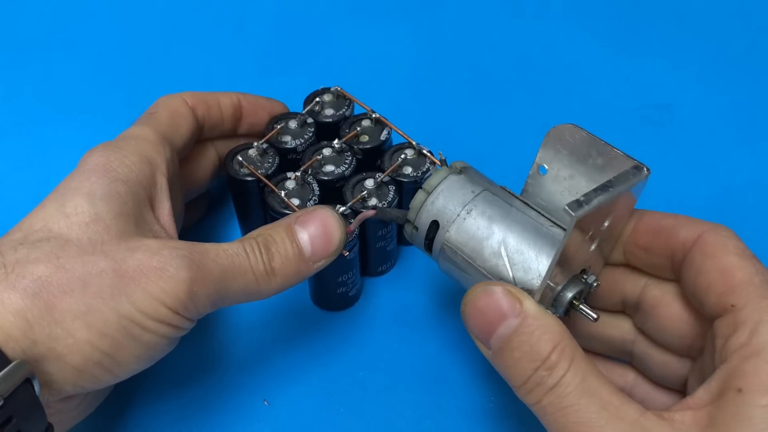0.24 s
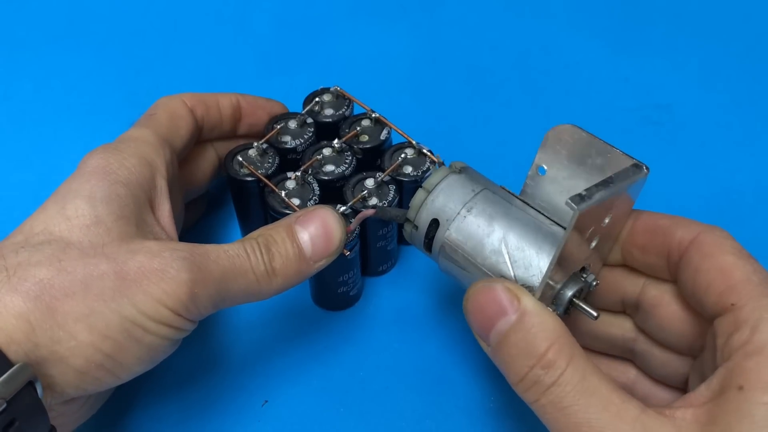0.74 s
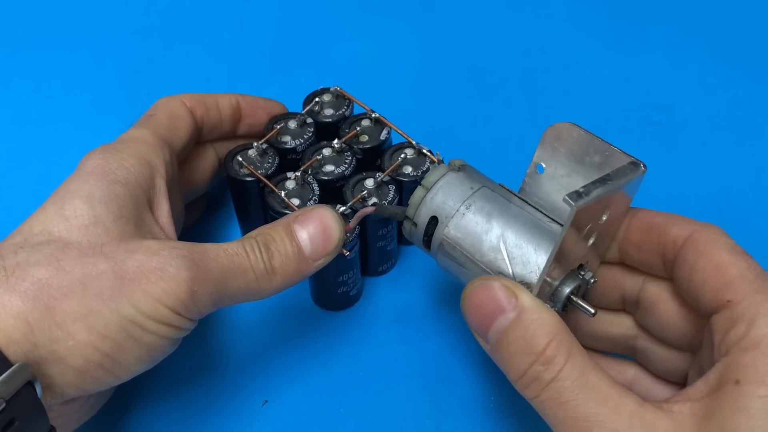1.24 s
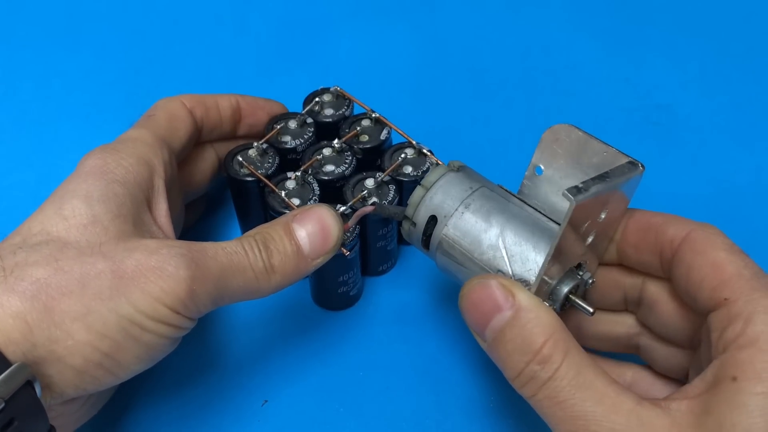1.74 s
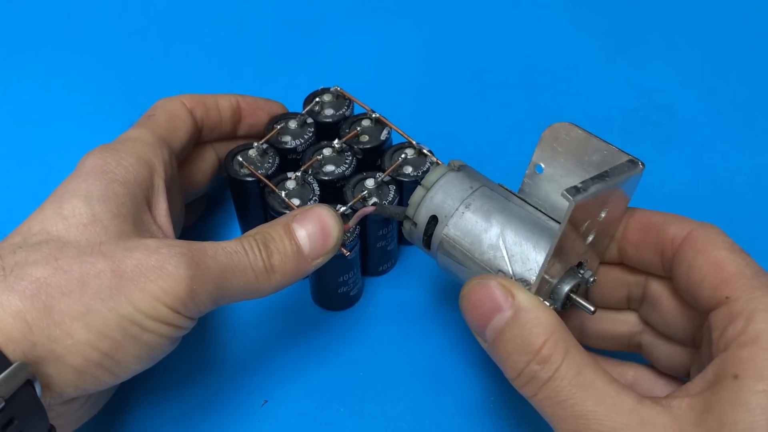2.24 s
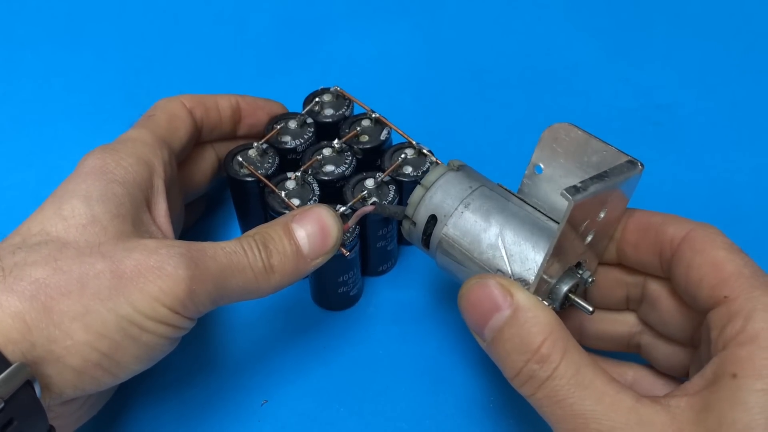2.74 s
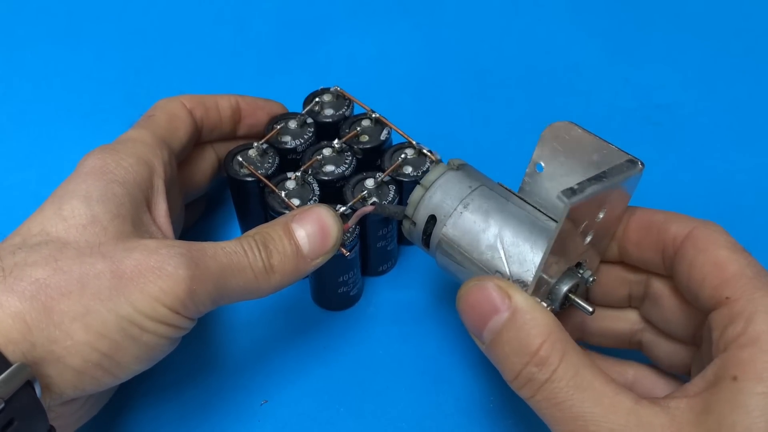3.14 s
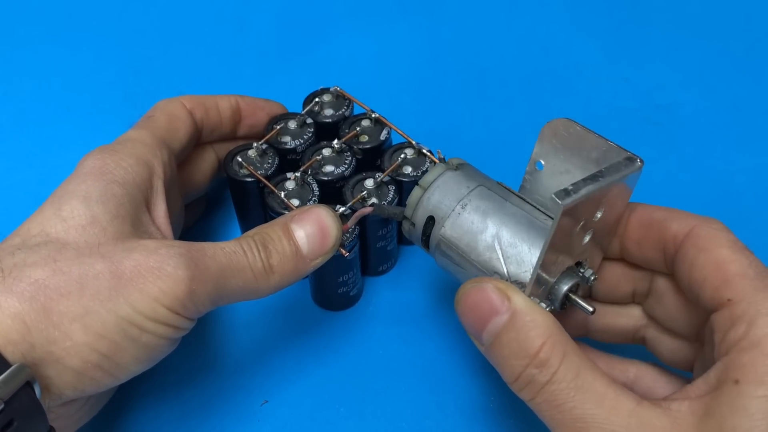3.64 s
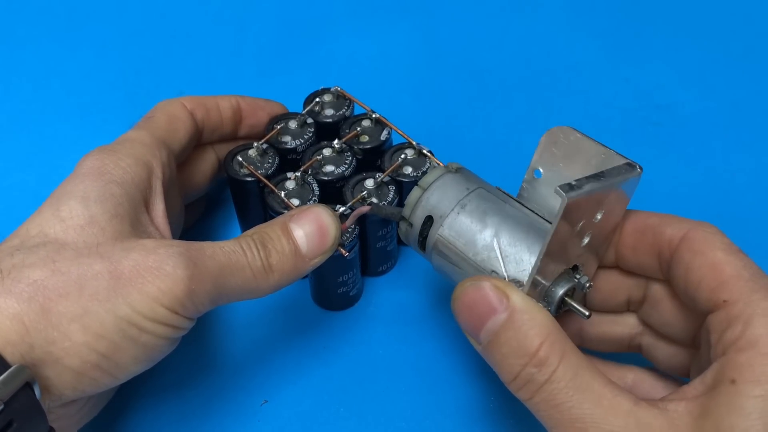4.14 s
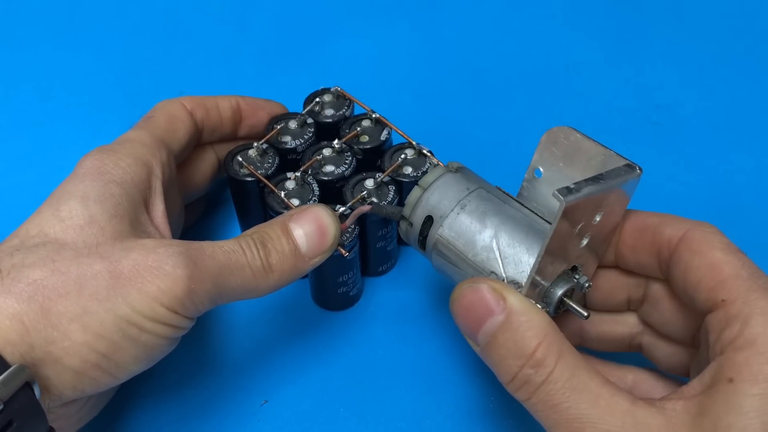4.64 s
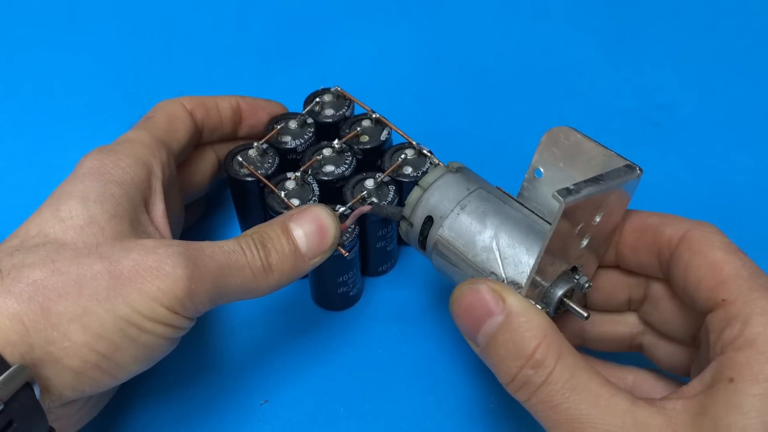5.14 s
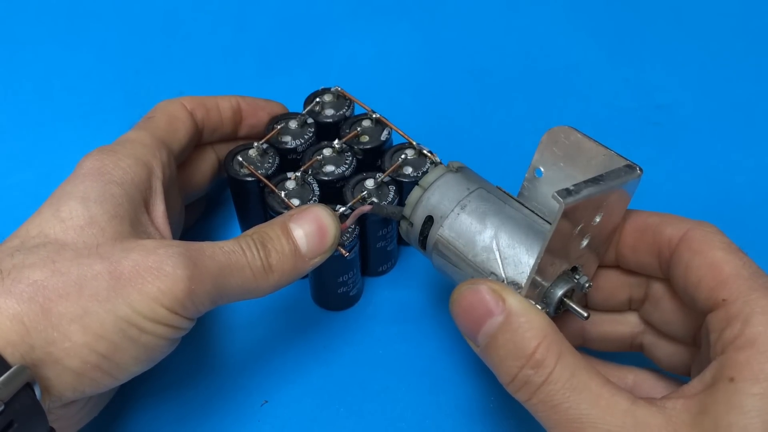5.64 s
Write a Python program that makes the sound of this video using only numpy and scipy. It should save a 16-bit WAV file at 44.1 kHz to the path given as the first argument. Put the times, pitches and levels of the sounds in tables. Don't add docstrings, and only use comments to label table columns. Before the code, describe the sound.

A small room holds quiet low rumble and a faint, steady far-off machine tone. At 0.5 s electrical contacts snap sharply with a dull hand thump, and a small brushed motor leaps to speed in under a tenth of a second, slapping its bearing: a high whine over a low buzz and bright, scratchy metallic hiss. Cut at about 0.76 s, it slides down in pitch and fades, breaking into quick rattling knocks that space out and die by about 1.25 s. At 1.36 s a crackle restarts it; the whine holds nearly steady, slightly wavering, its tone shifting as the grip tightens near 2.2 s. Released at 3.17 s, it coasts down with chattering, harder knocks slowing until about 3.75 s, then faint ticks and a soft bump near 3.88 s. At 4.02 s the loudest spark cluster starts a third steady whine, still running when it ends near 5.9 s.

```python
import sys
import numpy as np
from scipy import signal
from scipy.fft import rfft, irfft
from scipy.io import wavfile
from scipy.ndimage import uniform_filter1d

SR = 44100
rng = np.random.default_rng(int(sys.argv[2]) if len(sys.argv) > 2 else 0)


def transcribe(u):
    v = np.clip(np.atleast_2d(u).T, -1, 1)
    q = np.round(v * 32767).astype(np.int16)
    wavfile.write(sys.argv[1], SR, q)


def undo_db(level):
    steps = np.asarray(level, float) / 20
    return 10 ** steps


N = 259749
TIME = np.arange(N) / SR

# contact in seconds, release in seconds, coasting time constant in seconds,
# moment the shaft jumps its seat in seconds, a moment its high spot passes in seconds.
SPELLS = [
    (.502, .76, .935, .917, 1.1683),
    (1.357, 3.1664, 1.084, 3.405, 3.6661),
    (4.0195, 9, 1, 9.2, 4.5),
]
# time in seconds, firmness from 0 to 1.
GRIP = [(0, 0), (1.3, 0.5), (1.45, .45), (2.0, 0.5), (2.3, 0.88), (3.2, 1), (4.0, 1), (5.89, 1)]
# frequency in Hz, width in Hz, level in dB.
KNOCK_BODY = [(980, 260, 0.5), (2170, 270, -3.0), (2800, 450, 0.0), (5500, 760, -14)]
FULL_SPEED = 194
SPIN_UP_S = .021
RELEASE_S = 0.074


def in_time(rows):
    s, *columns = np.transpose(rows)
    return np.array([np.interp(TIME, s, c) for c in columns])


def by_value(rows, value):
    at, *columns = np.transpose(rows)
    return np.array([np.interp(value, at, c) for c in columns])


def at_hz(points, hz):
    point_hz, level_db = np.transpose(points)
    return np.interp(np.log(np.maximum(hz, 1)), np.log(point_hz), level_db)


def grip_firmness():
    return in_time(GRIP)[0]


def by_grip(rows):
    loose, firm = np.array(rows)[:, :, None]
    return loose + (firm - loose) * grip_firmness()


def rms_one(x):
    return x / np.sqrt(np.mean(x ** 2) + 1e-20)


def drift(rate):
    r = np.exp(-80 * np.pi * rate / SR)
    steps = rng.standard_normal(N // 40 + 2002)
    slow = rms_one(signal.lfilter([1], [1, -2 * r, r * r], steps)[2000:])
    return np.interp(np.arange(N) / 40, np.arange(len(slow)), slow)


def resonate(x, modes):
    out = 0
    for k, (hz, width_hz, db) in enumerate(modes):
        r = np.exp(-np.pi * width_hz / SR)
        a = [1, -2 * r * np.cos(2 * np.pi * hz / SR), r * r]
        b = [(1 - r * r) / 2, 0, (r * r - 1) / 2]
        out = out + (-1) ** k * undo_db(db) * signal.lfilter(b, a, x + 1e-18)
    return out


def tint(x, modes):
    hz = np.arange(N // 2 + 1) * SR / N + 1
    power = 0
    for f0, width, db in modes:
        power = power + undo_db(2 * db) / (1 + ((hz - f0 ** 2 / hz) / width) ** 2) ** 1.4
    return irfft(rfft(x) * np.sqrt(power), N)


def shelf(x, edge_hz, db):
    above = signal.sosfiltfilt(signal.butter(6, edge_hz, "high", fs=SR, output="sos"), x)
    return x + (undo_db(db) - 1) * above


def cracks(events, burst_s, top_modes, low_modes, top_db, low_db, alike=False):
    top, low, size = np.zeros(N), np.zeros(N), 256
    burst_n = burst_s * SR
    i = np.arange(size)
    bursts = np.sign(rng.standard_normal((len(events), size))) * np.exp(-i / burst_n)
    bursts *= np.minimum(i / (burst_n * .4), 1)
    bursts /= np.sqrt(np.sum(bursts ** 2, axis=1, keepdims=True) / (burst_n / 2))
    rung = np.std(resonate(bursts, top_modes), axis=1, keepdims=True)
    bright_bursts = bursts * np.median(rung) / rung
    push = np.sqrt(burst_n / 2) * (i == 20)
    for (s, peak_db, low_rel_db), burst, bright in zip(events, bursts, bright_bursts):
        at = round(s * SR)
        top[at:at + size] += undo_db(peak_db + top_db) * bright
        low[at:at + size] += undo_db(peak_db + low_rel_db + low_db) * (push if alike else burst)
    return resonate(top, top_modes) + resonate(low, low_modes)


def room():
    # frequency in Hz, density in dB per Hz.
    air_spectrum = [(12, -40), (20, 3.5), (77, -2), (163, -13.5), (300, -18), (558, -24.5), (850, -28),
                    (1530, -31), (1810, -30), (2530, -34), (3250, -33), (3530, -35), (5380, -26.5),
                    (10200, -43.5), (16000, -33)]
    # frequency in Hz, width in Hz, level in dB.
    rumble_modes = [(58.5, 10.4, 7.5), (82, 3.7, 3), (45.4, 8.3, -18), (106, 15, -6)]
    # time in seconds, level in dB.
    rumble_swell = [(0.0, -47.5), (0.79, -51.5), (1.23, -38.5), (1.54, -48.5), (2.28, -46), (2.66, -54),
                    (3.53, -49.5), (5.89, -49)]
    # multiple of its base tone, level in dB.
    far_lines = [(39, -75), (40, -76), (41, -76), (42, -72), (45, -73), (78, -79), (79, -72), (80, -69),
                 (82, -72), (83, -79), (84, -78), (86, -73), (91, -78), (92, -74), (97, -76), (99, -74),
                 (101, -77), (102, -66), (103, -77), (104, -76), (105, -72), (106, -71), (116, -74),
                 (118, -73), (120, -77), (121, -75), (123, -66), (124, -74), (125, -69), (127, -71),
                 (130, -78), (132, -76), (135, -77), (143, -76), (148, -72)]
    # frequency in Hz, level in dB.
    far_bands = [(1300, -100), (1600, -86), (1900, -88), (2200, -109), (3300, -100), (3550, -109),
                 (4600, -99), (5500, -100), (6600, -86), (9000, -93), (15500, -99)]
    room_db, far_hz = -44, 44.51
    far_sweep = .05
    hz = np.arange(N // 2 + 1) * SR / N
    air = irfft(rfft(rng.standard_normal(N)) * undo_db(at_hz(air_spectrum, hz)), N)
    rumble = undo_db(in_time(rumble_swell)[0] - 3.5) * rms_one(tint(rng.standard_normal(N), rumble_modes))
    multiple = np.arange(28, 350)
    line_db = at_hz(far_bands, multiple * far_hz) + rng.normal(-2, 3, len(multiple))
    for k, db in far_lines:
        line_db[k - multiple[0]] = db
    phase = rng.random(len(multiple)) - far_sweep * multiple ** 2
    comb = np.zeros(len(hz), complex)
    comb[np.round(multiple * far_hz * N / SR).astype(int)] = undo_db(line_db) * np.exp(1j * phase)
    return undo_db(room_db - 8.5) * rms_one(air) + rumble + irfft(comb, N) * N / 2


def contact_sparks():
    # time in seconds, peak in dB, 2-3 kHz level in dB above it.
    spark_times = [(.5013, -8.5, -8), (.511, -15, -6), (1.349, -46, -5), (1.3535, -38, 9),
                   (1.3568, -12, -5.5), (1.3607, -15, -5), (1.3642, -7, -18), (1.3728, -23, -10),
                   (4.007, -53, -6), (4.014, -45, 3), (4.0185, -27, -6), (4.022, -14.5, -6),
                   (4.0263, -10, -6), (4.0298, -3, -12), (4.0328, -14, -3), (4.0408, -20, -8),
                   (4.0435, -20, -10)]
    arc = [(12530, 810, 13.0), (8700, 890, -19.0), (15200, 1500, -5)]
    casing = [(2230, 240, 6.0), (3020, 320, 3.5), (5800, 1100, -27.0)]
    return cracks(spark_times, .0004, arc, casing, top_db=0.5, low_db=10.0)


def bump():
    # time in seconds, level in dB, frequency in Hz, 60 dB decay in seconds.
    thumps = [
        (.503, -33, 125, .11),
        (1.357, -34, 130, .11),
        (4.022, -36, 140, .1),
        (3.8836, -38, 350, .035),
        (3.795, -49, 280, .05),
        (1.295, -54, 800, .03),
    ]
    out, t = np.zeros(N + SR), np.arange(SR // 5) / SR
    for s, db, hz, t60 in thumps:
        tick = .09 * rng.standard_normal(len(t)) * np.exp(-t / .001)
        thump = np.sin(2 * np.pi * hz * t) * undo_db(-60 * t / t60)
        out[round(s * SR):][:len(t)] += undo_db(db) * (thump + tick)
    return out[:N]


def rotor():
    # time in seconds, speed in turns per second.
    powered_speed = [(.62, 192.4), (.68, 193.6), (.76, 190.3), (1.5, 193.6), (1.8, 191.9), (1.92, 194.5),
                     (2.03, 191.2), (2.1, 191.8), (2.17, 193.8), (2.32, 195.9), (2.6, 197.1), (2.67, 196.5),
                     (2.85, 197.1), (3.17, 196.4), (4.15, 192.8), (4.33, 194.5), (4.41, 193.6),
                     (4.62, 195.6), (4.69, 194.4), (4.77, 195.7), (4.84, 195.7), (4.97, 192.9),
                     (5.04, 194.1), (5.32, 194.2), (5.45, 192.4), (5.53, 193.1), (5.73, 193.2),
                     (5.82, 194.3)]
    friction_speed = 213.7
    out, powered = np.zeros((5, N)), in_time(powered_speed)[0]
    out[2:4] = [[1e-6], [-1]]
    for on, off, coast_s, jump, mark in SPELLS:
        start = np.interp(off, *np.transpose(powered_speed)) + friction_speed

        def coast(s):
            return np.maximum(start * np.exp((off - s) / coast_s) - friction_speed, 0)

        since = np.maximum(TIME - on, 1e-6)
        speed = np.where(TIME < off, powered * (1 - np.exp(-since / SPIN_UP_S)), coast(TIME))
        turns = np.cumsum(speed) / SR
        turns = turns - turns[round(mark * SR)]
        out = np.where(TIME >= on, [speed, turns, since, TIME - off, speed / coast(jump)], out)
    return out


def hiss_levels(since_on, since_off, ratio):
    # treble, middle casing and low casing in dB.
    powered_hiss = [(-26.5, -28, -56), (-32.5, -26.5, -51)]
    # speed over seat-jump speed, treble, middle and low casing in dB.
    coasting_hiss = [(0, -75, -70, -76), (.1, -70, -49, -67), (.27, -54, -40.5, -60),
                     (.36, -51.5, -40, -62.5), (.62, -45, -37, -58), (.86, -39, -32.5, -54),
                     (.97, -40.5, -34.5, -87), (1.02, -34.5, -28.5, -52), (1.27, -32.5, -29, -55.5)]
    # start in seconds, end in seconds, treble in dB.
    seat_chatter = [
        (3.27, 3.376, -1.5),
        (3.378, 3.395, 4),
        (3.398, 3.427, -4),
        (3.434, 3.474, 1),
        (3.473, 3.54, 3),
        (3.54, 3.7, -1),
    ]
    surge = np.exp(-since_on / .064)
    flare = 4 * np.exp(-((since_on - .062) / .044) ** 2) - 3 * surge
    contact_db = 20 * np.log10(1 - np.exp(-since_on / .003))
    powered = by_grip(powered_hiss) + [flare, 2.5 * surge, -0.5 * surge] + contact_db
    coasting = by_value(coasting_hiss, ratio)
    coasting[0] += 6 * grip_firmness() * np.exp(-((ratio - .895) / .15) ** 2)
    chatter_db = sum(db * ((TIME > start) & (TIME < end)) for start, end, db in seat_chatter)
    coasting[0] += uniform_filter1d(chatter_db, size=60)
    released = np.clip(since_off / RELEASE_S, 0, 1)
    return powered + (coasting - powered) * released


def brushes(speed, turns, top_db, mid_db, low_db):
    # frequency in Hz, width in Hz, level in dB.
    low_coasting = [(195, 35, -9), (750, 220, -4), (1050, 300, 1), (1300, 150, -7), (1500, 120, -11)]
    # frequency in Hz, width in Hz, level in dB.
    low_powered = [(460, 73, -15.5), (693, 154, -4), (940, 320, -5), (1270, 88, -6), (1474, 140, -1.5)]
    # frequency in Hz, width in Hz, level in dB.
    mid_casing = [(2205, 208, 14), (2830, 600, 9.5), (4020, 430, 7.5), (4370, 133, 5), (4900, 400, 1),
                  (5570, 700, 5.5), (5560, 350, 5), (5970, 840, -2)]
    # frequency in Hz, width in Hz, level in dB with loose grip, level in dB with firm grip.
    top_casing = [(7300, 960, -15.5, -11.5), (8500, 610, 1, -0.5), (9350, 350, -0.5, 3),
                  (9890, 210, 4.5, -1), (11400, 1360, -3.5, -4), (12400, 640, -4, -8.5),
                  (13300, 280, 5.5, 0.5), (13800, 400, -5, -2), (14500, 600, -6, -6),
                  (15600, 840, -2, -1.5)]

    bar = 12 * turns
    rub_db = np.interp(bar % 12, np.arange(13), rng.normal(0, 1, 12)[np.arange(13) % 12])
    rub = rng.standard_normal(N) * undo_db(0.43 * rub_db + 0.51 * drift(42))
    crossed = np.flatnonzero(np.diff(np.floor(bar)) == 1)
    late = (bar[crossed + 1] % 1) / (bar[crossed + 1] - bar[crossed])
    wear = rng.normal(0, 1, 12)[(bar[crossed + 1] % 12).astype(int)]
    snaps = np.zeros(N)
    snaps[crossed] += wear * late
    snaps[crossed + 1] += wear * (1 - late)

    since_turn = (turns % 1) / np.maximum(speed, 5)
    turning = np.clip(speed / 45, 0, 1) ** 2
    rub *= 1 + 3.5 * np.exp(-since_turn / .0025) * np.clip(1.2 - speed / 110, 0, .8) * turning
    drive = rub + undo_db(-6) * rms_one(snaps)

    since_cog = (3 * turns % 1) / np.maximum(3 * speed, 5)
    cog = .25 + 2.5 * np.exp(-since_cog / .0015) * np.clip(1.1 - speed / 140, .1, 1)
    cog /= np.sqrt(uniform_filter1d(cog ** 2, 2000))
    jolts = np.append(np.diff(np.floor(3 * turns)) == 1, 0)
    jolts = jolts * np.sqrt(SR / np.maximum(3 * speed, 60)) * turning
    jolts *= undo_db(2.5 * drift(120))

    firm = grip_firmness() * np.clip(speed / FULL_SPEED, 0, 1) ** 4
    firm = np.clip(firm + .22 * drift(1.5), -.2, 1.3)
    loose_top = rms_one(tint(drive, [m[:3] for m in top_casing]))
    firm_top = rms_one(tint(drive, [m[:2] + m[3:] for m in top_casing]))
    top = undo_db(top_db + 0.03) * ((1 - firm) * loose_top + firm * firm_top)

    faint = undo_db(-11.5 * np.clip(2 - 2 * speed / 68, 0, 1))
    mid = faint * tint(rub * cog ** 0.2, mid_casing[:2]) + tint(rub * cog ** 0.081, mid_casing[2:])
    mid = undo_db(mid_db - 8.0) * mid / np.std(mid[speed > 100])

    slow = np.clip(1.05 - speed / 120, 0, .58)
    fast = np.clip(speed / FULL_SPEED, 0, 1) ** 6
    low = (1 - slow) * rub * cog + slow * jolts
    low = (1 - fast) * rms_one(tint(low, low_coasting)) + fast * rms_one(tint(low, low_powered))
    return (top + mid + undo_db(low_db + 5.0) * low) * (speed > 0)


def treble_colour(x, since_off, ratio):
    firm = np.clip(grip_firmness(), 0, 1)
    loose = (1 - firm) ** 4 * np.clip(1 - since_off / RELEASE_S, 0, 1)
    x = shelf(shelf(x, 7800, -12.5 * loose), 12400, 16 * loose)
    dull_db = -7 * firm ** 2 * (since_off > 0) * np.exp(-((ratio - .98) / .41) ** 2)
    return shelf(x, 14000, dull_db)


def shake(speed, since_on, since_off):
    # order 1, order 3 and order 12 in dB.
    powered_shake = [(-48, -47.5, -30.5), (-49.5, -42, -29.5)]
    # speed in turns per second, order 1, order 3 and order 12 in dB.
    shake_by_speed = [(0, -43, -48, -66), (64, -18, -28, -37), (86, -3, -23, -31), (111, -6, -17, -46),
                      (136, -6, -6, -24), (160, -7, -3, -25), (172, -5, -1.5, -4), (184, -4, 1.5, 3.5),
                      (188, 0, 0, 1)]
    rise = 1 - np.exp(-since_on / SPIN_UP_S)
    coasting_db = by_value(shake_by_speed, speed) * (since_off > 0)
    shaft_db, pole_db, bar_db = by_grip(powered_shake) + coasting_db
    bar_db = bar_db + 6 * np.exp(-((since_on - .072) / .017) ** 2) + 105 * np.log10(rise)
    shaft_db = shaft_db + 2.5 * grip_firmness() * np.clip(since_off / RELEASE_S, 0, 1)
    fade_db = 30 * np.log10(rise)
    return shaft_db + fade_db, pole_db + fade_db, bar_db


def whine(speed, turns, since_on, shaft_db, pole_db, bar_db):
    # multiple of shaft speed, level in dB.
    loose_orders = [(1, -12), (2, -40.5), (3, -14), (4, -18.5), (5, -57), (6, -15.5), (7, -31), (8, -46),
                    (9, -17), (10, -14.5), (11, -50), (12, 0), (13, -22), (14, -11), (15, -29), (16, -6),
                    (17, -18), (18, -14), (19, -19), (20, -7.5), (21, -15.5), (22, -19), (23, -6),
                    (24, -22), (25, -30), (26, -42), (27, -10), (28, -19), (29, -16), (30, -36)]
    # multiple of shaft speed, level in dB.
    firm_orders = [(1, -19.5), (2, -37.5), (3, -11), (4, -16), (5, -56), (6, -16.5), (7, -18), (8, -22),
                   (9, -13.5), (10, -15.5), (11, -44), (12, 0), (13, -16.5), (14, -30), (15, -29),
                   (16, -12.5), (17, -21.5), (18, -17), (19, -16), (20, -13), (21, -10.5), (22, -17.5),
                   (23, -18), (24, -15), (25, -27), (26, -34), (27, -13), (28, -14.5), (29, -19.5),
                   (30, -23.5)]
    # multiple of shaft speed, level in dB.
    high_orders = [(31, -28), (32, -31), (33, -22), (34, -30.5), (35, -28)]
    # multiple of shaft speed, change in dB.
    unpowered_orders = [(4, -6.5), (6, 3), (7, -4), (8, -1.5), (9, -11), (10, -9), (20, -8), (27, -6)]
    # multiple of shaft speed, change in dB.
    shifted_orders = [(8, 3), (11, 5), (13, 2), (15, 4), (16, -1.5), (17, 2), (19, 2), (20, -6), (23, -3),
                      (27, -8), (29, -3), (30, 2), (32, 7), (33, 4.5), (35, -9)]
    # multiple of shaft speed, change in dB.
    reseated_orders = [(6, 0), (8, -2), (13, -6), (14, -1), (15, -8), (17, -1), (18, 0), (19, -8), (22, 0),
                       (23, 2), (28, 1), (29, 6), (30, -8), (31, 6)]
    # frequency in Hz, level in dB.
    radiation = [(100, -13.5), (300, 0.5), (600, 8.5), (1000, 6.5), (1400, -2.5), (1750, -14), (2300, -15),
                 (3000, -3), (5230, 5), (5320, 11), (5430, 1.5), (5520, -1), (5600, 36), (6600, 17.5),
                 (6690, 34), (6780, 22)]
    hop = 16
    firm, t, slow_speed = grip_firmness()[::hop], TIME[::hop], speed[::hop]

    def slide(k):
        return at_hz(radiation, k * slow_speed) - at_hz(radiation, k * FULL_SPEED)

    third_db = dict(loose_orders)[3] * (1 - firm) + dict(firm_orders)[3] * firm + slide(3)
    slowed = np.clip(1 - slow_speed / FULL_SPEED, 0, 1)
    unpowered = np.clip(10 * slowed - .3, 0, 1)
    shifted = np.clip((t - 4.3) / .97, 0, 1)
    reseated = t > SPELLS[-1][0]
    torque_db = 0 * np.exp(-((since_on[::hop] - .061) / .098) ** 2)
    out = 0
    for (k, loose_db), (_, firm_db) in zip(loose_orders + high_orders, firm_orders + high_orders):
        level_db = pole_db[::hop] - third_db + loose_db * (1 - firm) + firm_db * firm + slide(k)
        level_db -= slowed * (22 if k > 12 else 20 * (k > 3))
        level_db += dict(unpowered_orders).get(k, 0) * unpowered
        level_db += dict(shifted_orders).get(k, 0) * shifted
        level_db += dict(reseated_orders).get(k, 0) * reseated
        level_db += torque_db * (k > 23.5)
        level_db += 12 * slowed * (k == 2)
        if k == 1:
            level_db = shaft_db[::hop] + 5 * shifted
        elif k == 12:
            level_db = bar_db[::hop]
        waver_db = (.7 if k in (1, 3, 12, 21) else 1.3) * drift(6)
        wobble = .005 * k * (1 + 2 * np.repeat(slowed, hop)[:N]) * drift(25)
        phase = 2 * np.pi * k * turns + wobble + rng.uniform(0, 2 * np.pi)
        out = out + undo_db(np.repeat(level_db, hop)[:N] + waver_db + 3) * np.sin(phase)
    return out


def bar_pattern(speed, turns, since_off):
    # multiple of shaft speed, rms in dB as first seated, once settled, after the last touch.
    worn_bars = [(36, -58, -64, -60), (37, -62, -61, -54), (38, -63, -70, -66), (39, -53, -61, -61),
                 (40, -54, -55, -53), (41, -58, -50, -55), (42, -51, -50, -50), (43, -51, -56, -57),
                 (44, -44, -54, -50), (45, -46, -52, -50), (46, -50, -53, -56), (47, -51, -51, -57),
                 (48, -49, -54, -48), (49, -61, -54, -56), (50, -60, -58, -63), (51, -46, -58, -52),
                 (52, -51, -61, -63), (53, -65, -61, -63), (54, -52, -56, -55), (55, -61, -63, -59),
                 (56, -60, -67, -66), (57, -60, -55, -59), (58, -52, -60, -55), (59, -61, -59, -61),
                 (60, -57, -55, -56), (61, -56, -55, -66), (62, -52, -55, -62), (63, -63, -55, -64),
                 (64, -57, -61, -61), (65, -55, -56, -61), (66, -66, -59, -62), (67, -52, -58, -59),
                 (68, -55, -55, -62), (69, -62, -57, -56), (70, -59, -53, -50), (71, -55, -60, -54),
                 (72, -62, -65, -58), (73, -63, -56, -60), (74, -51, -53, -59), (75, -53, -57, -61),
                 (76, -53, -52, -62), (77, -52, -54, -58), (78, -56, -59, -61), (79, -56, -55, -53),
                 (80, -57, -58, -55)]
    # time in seconds, which level column sounds (counted from 0).
    seating = [(0, -.4), (1.2, -.4), (1.4, 0), (2.0, 0), (2.3, 1), (3.5, 1), (3.9, 2), (5.89, 2)]
    k, *columns = np.transpose(worn_bars)
    size, seat, out = 8192, in_time(seating)[0], 0
    phase = np.exp(2j * np.pi * rng.random(len(k)))
    for group in range(3):
        at = (turns + .0007 * drift(25)) % 1 * size
        waver = undo_db(2.5 * drift(5))
        for c, db in enumerate(columns):
            spectrum = np.zeros(size // 2 + 1, complex)
            spectrum[k.astype(int)] = undo_db(db + 3) * phase * (k % 3 == group)
            shape = irfft(spectrum, size) * size / 2
            turn_sound = np.interp(at, np.arange(size + 1), np.append(shape, shape[0]))
            out = out + waver * np.clip(1 - abs(seat - c), 0, 1) * turn_sound
    at_speed = np.clip(speed / FULL_SPEED, 0, 1) ** 19.0
    return undo_db(1.5) * out * at_speed * np.clip(1 - since_off / RELEASE_S, 0, 1)


def bearing_slaps():
    # time in seconds, peak in dB, 2-3 kHz level in dB above it.
    slap_times = [(.6258, -13, -16), (.6305, -18, -16), (1.401, -20, -16), (1.411, -17, -16),
                  (1.4143, -20, -13), (1.4158, -18, -18), (1.4168, -10, -12), (4.0535, -17, -18),
                  (4.0555, -17, -22), (4.066, -19, -16), (4.0685, -15, -16), (4.075, -18, -16)]
    # frequency in Hz, width in Hz, level in dB.
    slap_ring = [(8600, 800, 6), (9900, 630, 7), (11600, 980, 12), (12800, 160, 18), (14500, 900, 8)]
    return cracks(slap_times, .0009, slap_ring, KNOCK_BODY, top_db=-1.5, low_db=12.0)


def knock_list(turns, since_off, ratio):
    # speed over seat-jump speed, peak in dB.
    lead_knock = [(0, -70), (.1, -66), (.27, -56), (.34, -34), (.42, -28.5), (.6, -27.5), (.86, -24.5),
                  (.97, -34), (1.02, -21), (1.27, -22.5), (1.36, -40)]
    # time in seconds, change in dB.
    uneven_turns = [(1.0, -8), (1.012, -8), (1.034, -8), (1.046, -1), (1.059, -3), (1.071, -12),
                    (1.085, -4), (1.114, -7), (1.13, -1), (1.148, -12), (1.192, -8), (3.285, -4),
                    (3.292, -6), (3.2985, -7), (3.3055, 6), (3.312, -8), (3.326, -8), (3.333, -8),
                    (3.34, 1), (3.371, -6), (3.46, -4), (3.468, -5), (3.479, -3), (3.549, 2), (3.563, 1),
                    (3.577, -2), (3.609, 0), (3.592, -8), (3.626, 2), (3.645, -5), (3.666, 5), (3.717, -5)]
    firm = grip_firmness()
    seated = ratio > 1
    lag_turns = -.04 - .2 * firm
    pole = np.floor(3 * (turns - lag_turns * seated))
    at = np.flatnonzero((np.diff(pole) == 1) & (since_off[1:] > 0)) + 1
    chance = rng.standard_normal((400, 2))[:len(at)]
    peak_db = by_value(lead_knock, ratio)[0] + 6 * firm * np.clip(2 - 2 * ratio, 0, 1)
    side_db = -14.5 * (pole[at] % 3 != seated[at])
    peak_db = peak_db[at] + side_db + 1.2 * chance[:, 0]
    for s, db in uneven_turns:
        peak_db += db * (abs(at / SR - s) < .0025)
    body_db = -16 + 11 * np.clip(1 - ratio[at], 0, 1) + 2 * chance[:, 1]
    return list(zip(at / SR - .0006, peak_db, body_db))


def shaft_knocks(turns, since_off, ratio):
    # time in seconds, peak in dB, casing level in dB above it.
    stray_ticks = [(1.143, -37, -12), (1.161, -32, -11), (1.1755, -45, -16), (1.183, -42, -14),
                   (1.198, -43, -10), (1.208, -45, -8), (1.227, -44, -14), (1.2865, -49, -8),
                   (3.506, -20, -16), (3.519, -24, -13), (3.706, -37, -10), (3.739, -44, -12),
                   (3.754, -51, 10), (3.78, -49, -3), (3.812, -54, -10), (3.882, -72, 31.5)]
    ring = [(8630, 500, -6.5), (9260, 390, -6.5), (11100, 630, -7), (13000, 480, -1.5), (15000, 1500, -14)]
    events = knock_list(turns, since_off, ratio) + stray_ticks
    return cracks(events, .0015, ring, KNOCK_BODY, top_db=12.0, low_db=7.0, alike=True)


def scene():
    speed, turns, since_on, since_off, ratio = rotor()
    background = room()
    contact = contact_sparks() + bump()
    hiss = brushes(speed, turns, *hiss_levels(since_on, since_off, ratio))
    knocks = shaft_knocks(turns, since_off, ratio)
    casing = treble_colour(hiss + knocks, since_off, ratio)
    tones = whine(speed, turns, since_on, *shake(speed, since_on, since_off))
    pattern = bar_pattern(speed, turns, since_off)
    mono = background + contact + casing + tones + pattern + bearing_slaps()
    return np.array([mono, mono])


def top_cut(x):
    return signal.sosfilt(signal.butter(12, 16830, fs=SR, output="sos"), x)


def record(dry):
    cut = dry / (1 + (dry / .8) ** 4) ** .25
    cut = signal.sosfilt(signal.ellip(14, .6, 38, 15700, fs=SR, output="sos"), cut)
    cut = signal.sosfilt(signal.cheby2(14, 50, 17200, fs=SR, output="sos"), cut)
    cut = signal.sosfilt(signal.butter(4, 41, "high", fs=SR, output="sos"), cut)
    return top_cut(cut)


dry = scene()
out = record(dry)
transcribe(out)
```